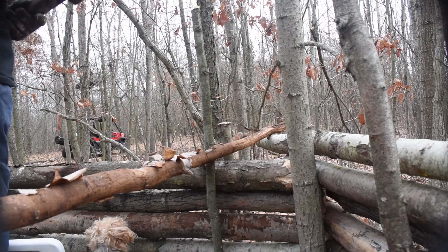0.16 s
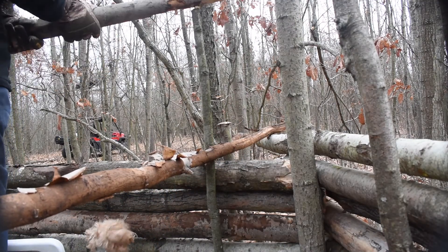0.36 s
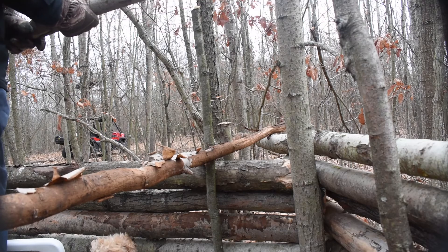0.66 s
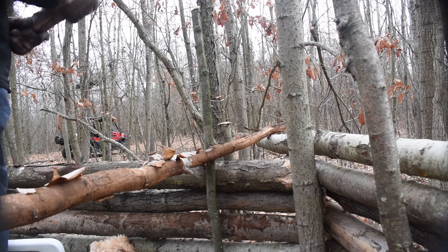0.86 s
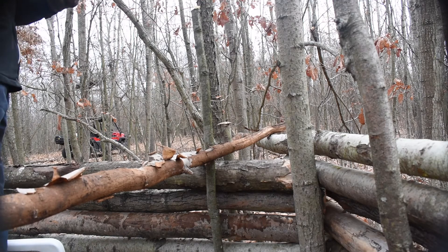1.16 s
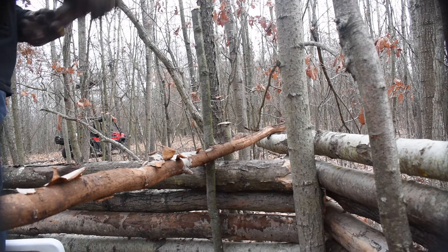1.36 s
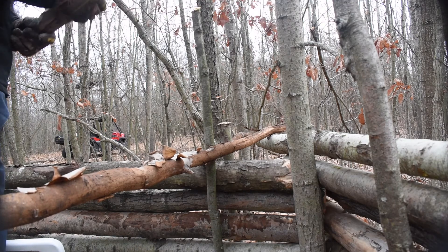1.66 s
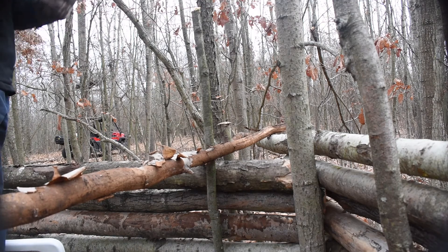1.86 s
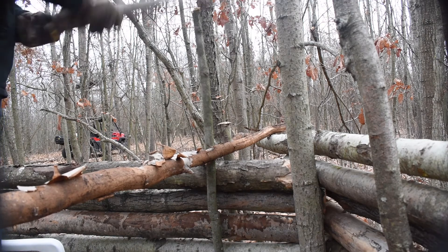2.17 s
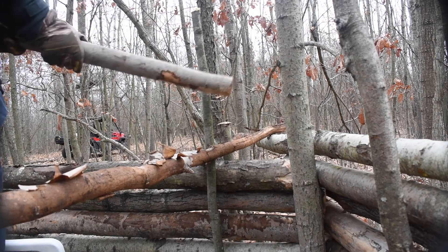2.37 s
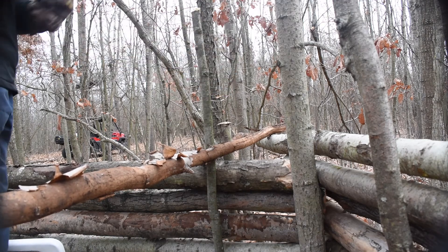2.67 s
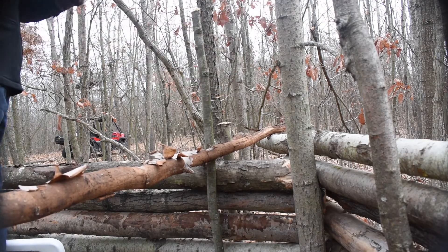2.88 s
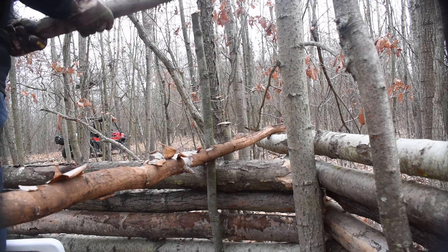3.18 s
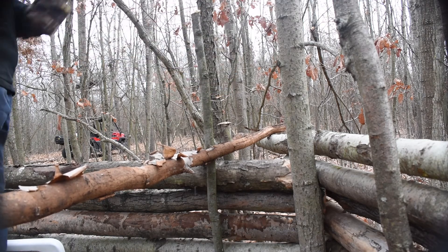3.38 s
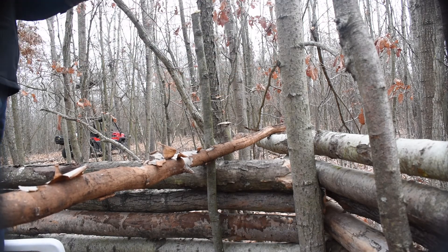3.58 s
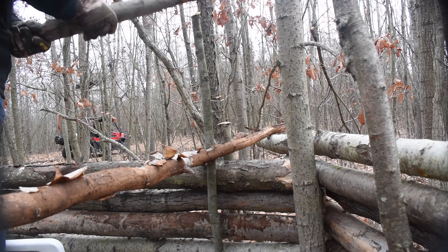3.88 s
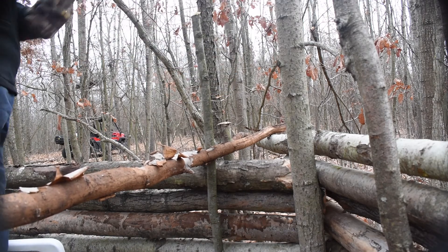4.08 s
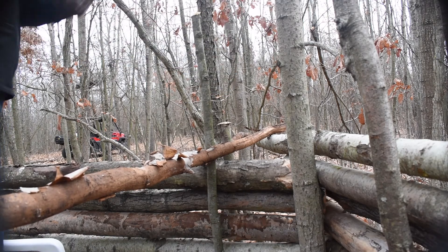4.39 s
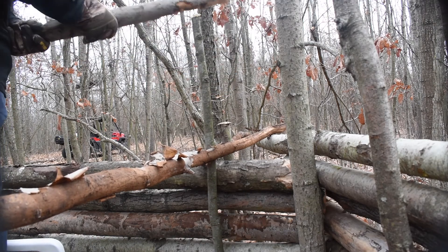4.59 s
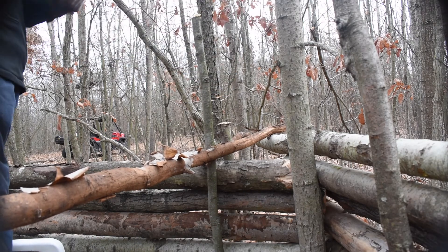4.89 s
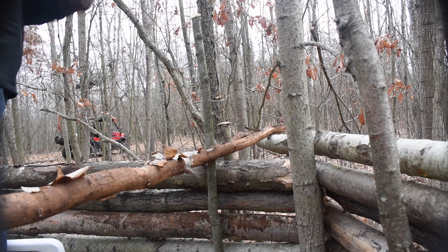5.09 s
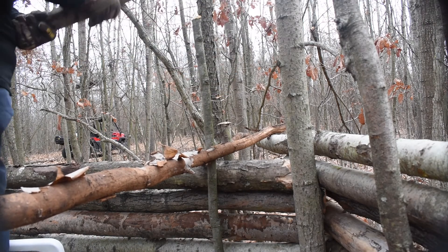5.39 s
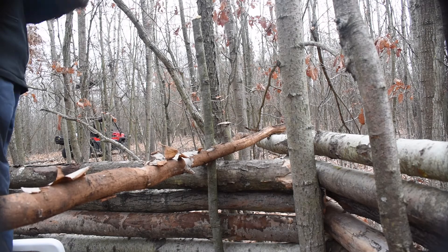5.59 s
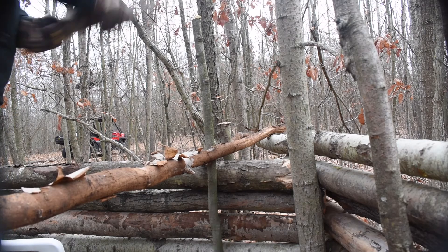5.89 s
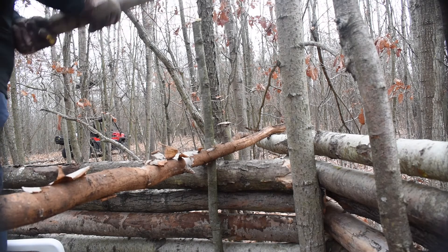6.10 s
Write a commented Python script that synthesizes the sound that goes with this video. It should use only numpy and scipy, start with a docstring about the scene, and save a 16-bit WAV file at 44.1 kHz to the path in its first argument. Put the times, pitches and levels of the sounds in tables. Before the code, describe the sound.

Eight heavy knocks of a pole against stacked logs sound right beside the microphone, the first softer and the later ones harder and slightly distorted. Bark cracks, the logs thud deeply and nearby trees return a short echo. Sticks clack and a tiny metal tag tinkles faintly in the opening seconds, while soft jacket swishes and dry leaf crackles fill the gaps. Behind it lie quiet woodland air and a faint far rumble.

```python
"""A wooden pole is swung eight times against a log wall in bare woods, close to the microphone.
Each blow crushes bark, rings the pole and sets the stacked logs booming; the trees scatter it back,
and the hardest blows overload the microphone. Between them a jacket swishes, dry leaves are scuffed,
sticks clack and a small metal tag tinkles, over still air and a far rumble."""
import sys
import numpy as np
from scipy import signal
from scipy.fft import rfft, irfft
from scipy.io import wavfile
from scipy.ndimage import map_coordinates

SR = 44100
rng = np.random.default_rng(int(sys.argv[2]) if len(sys.argv) > 2 else 0)


def file_out(sig):
    """Save sig as 16-bit WAV at sys.argv[1]."""
    # one column per channel
    cols = np.atleast_2d(sig).T
    # limit, then scale
    lim = np.clip(cols, -1, 1)
    pcm = np.round(lim * 32767).astype(np.int16)
    wavfile.write(sys.argv[1], SR, pcm)


N = 275625
T = np.arange(N) / SR
RING = T[:int(1.5 * SR)]  # time axis of one event, in seconds

# Spectrum of dry leaves underfoot. Each row: frequency in Hz, level in dB.
LEAF_SPECTRUM = [(300, -6.5), (1000, 3.5), (2200, 1.5), (3200, -0.5), (4600, 7), (6000, -6), (7800, 0.5),
                 (11000, -10), (16000, -29)]


def undb(db):
    """Decibels to gain."""
    return 10 ** (np.asarray(db) / 20)


def fade(t60):
    """Exponential decay, 60 dB down after t60 seconds."""
    return np.exp(-np.log(1000) * RING / t60)


def swell(peak_s):
    """A contact force that peaks and lets go."""
    return (RING / peak_s * np.exp(1 - RING / peak_s)) ** 0.98


def stroke(length_s, attack_s, release_s):
    """A movement gathers speed, holds and dies away."""
    return np.minimum(RING / attack_s, 1) * np.exp(-np.maximum(RING - length_s, 0) / release_s)


def add(out, s, sound):
    """Mix a sound in at s seconds."""
    i = max(int(s * SR), 0)
    out[i:i + len(sound)] += sound[:N - i]


def colour(x, points, tilt_db=0):
    """Give white noise or clicks a spectrum of (Hz, dB) points, tilted per octave; rms 1."""
    hz, db = np.transpose(points)
    octave = np.log2(np.maximum(np.fft.rfftfreq(len(x), 1 / SR), 1))
    bass_cut_db = 20 * np.minimum(octave - np.log2(hz[0]), 0)
    gain = undb(np.interp(octave, np.log2(hz), db) + tilt_db * octave + bass_cut_db)
    y = irfft(rfft(x) * gain, len(x))
    return y / np.std(y)


def hiss(points, tilt_db=0):
    """Coloured noise as long as one event."""
    return colour(rng.standard_normal(len(RING)), points, tilt_db)


def grains(per_s, spread_db):
    """Tiny clicks of uneven size at random times."""
    clicks = (rng.random(N) < per_s / SR) * rng.standard_normal(N)
    return clicks * undb(spread_db * np.minimum(rng.exponential(size=N), 4))


def walk(per_s):
    """Random wander, spread near 1."""
    knots = rng.standard_normal(1024)
    return np.interp(T * per_s, np.arange(len(knots)), knots)


def patchy(x, depth_db, per_s, width_hz):
    """Let patches of the spectrum swell and fade at random; rms 1."""
    hz, s, spectra = signal.stft(x, SR, nperseg=512)
    knots = rng.standard_normal((512, 512))
    grid = np.meshgrid(hz / width_hz, s * per_s, indexing="ij")
    db = depth_db * map_coordinates(knots, grid, order=1)
    y = signal.istft(spectra * undb(db), SR)[1][:len(x)]
    return y / np.std(y)


def ring(modes, rise_s, weights_db=0):
    """Decaying modes that build up while the contact lasts."""
    hz, db, t60 = np.transpose(modes)[:, :, None]
    waves = undb(db + np.reshape(weights_db, (-1, 1))) * fade(t60) * np.cos(2 * np.pi * hz * RING)
    return waves.sum(0) * (1 - np.exp(-RING / rise_s))


def woods():
    """The bed of the place: still air among bare trees over a far rumble."""
    # Spectra of the air and the rumble. Each row: frequency in Hz, level in dB.
    air_spectrum = [(120, -16), (300, -10), (650, -10.5), (1200, -13.5), (1700, -18.5), (4000, -21.5),
                    (7000, -28), (16000, -32)]
    rumble_spectrum = [(20, -6.5), (35, -2.5), (55, 0.5), (90, -14), (130, -3), (170, -19.5), (300, -37.5),
                       (1000, -71.5)]
    air_level = undb(-58.5 + 0.39 * walk(3))
    air = patchy(colour(rng.standard_normal(N), air_spectrum), depth_db=1, per_s=25, width_hz=200)
    rumble = undb(-51.5 + 1.5 * walk(1.3)) * colour(rng.standard_normal(N), rumble_spectrum)
    return air_level * air + rumble


def jacket(attack_s=0.021, release_s=0.051):
    """Cloth slides over cloth: a fine grain that catches unevenly and swells with each arm stroke."""
    # Spectrum of rubbing cloth. Each row: frequency in Hz, level in dB.
    cloth_spectrum = [(250, -7.5), (600, 3.5), (1500, 4.5), (3200, 4), (4700, 0), (6000, -11.5),
                      (7800, -12), (11000, -18.5), (16000, -30)]
    # Sleeve strokes. Each row: start in seconds, length in seconds, level in dB, treble trim in dB.
    swishes = [(0.0, 0.078, -47, -6), (1.558, 0.076, -52.5, -5), (1.759, 0.19, -54, -0.5),
               (1.843, 0.28, -54.5, 0), (2.39, 0.023, -47.5, -1), (2.44, 0.062, -59.5, 0),
               (2.649, 0.21, -51, -4), (2.86, .15, -50, -2), (3.255, .07, -45.5, -4),
               (3.307, 0.056, -42, -3), (3.449, 0.13, -47.5, -3), (3.593, .17, -43, 0),
               (3.663, 0.034, -37, -5), (3.917, 0.08, -47, -4.5), (4.03, 0.11, -47, -4),
               (5.3, 0.021, -50, -3), (5.711, 0.043, -45.5, -4)]
    rub = colour(grains(per_s=5000, spread_db=2.5), cloth_spectrum) * undb(1.5 * walk(70))
    rub = patchy(rub, depth_db=3.5, per_s=25, width_hz=300)
    treble = signal.sosfiltfilt(signal.butter(4, 5500, "high", fs=SR, output="sos"), rub)
    body_power, treble_power = np.zeros(N), np.zeros(N)
    for s, length, db, treble_db in swishes:
        level = undb(db) * stroke(length, attack_s, release_s)
        add(body_power, s, level ** 2)
        add(treble_power, s, (undb(treble_db - 6) * level) ** 2)
    return np.sqrt(body_power) * (rub - treble) + np.sqrt(treble_power) * treble / np.std(treble)


def litter():
    """Dry leaves tick faintly here and there underfoot."""
    tick = rng.standard_normal(len(RING)) * fade(0.008)
    ticks = signal.fftconvolve(grains(per_s=45, spread_db=1.5), tick)[:N]
    ticks = colour(ticks, LEAF_SPECTRUM, tilt_db=1.5)
    return undb(-69) * patchy(ticks, depth_db=3, per_s=30, width_hz=3000)


def leaves(bite_db=2, bite_s=0.008):
    """Each scuff through dry leaves bites at once, crackles while it lasts and dies away."""
    # Scuffs on the ground. Each row: start in seconds, length in seconds, level in dB.
    scuffs = [(0.135, .025, -52), (1.106, .012, -44.5), (1.151, 0.018, -47), (1.377, 0.031, -47),
              (1.467, 0.036, -41.5), (1.715, 0.0087, -47.5), (2.155, 0.007, -42), (4.919, 0.0022, -39.5),
              (4.945, 0.063, -47), (5.029, 0.035, -45.5), (5.588, 0.055, -38), (5.663, 0.032, -39),
              (5.811, 0.025, -46.5)]
    level = np.zeros(N)
    bite = undb(bite_db * np.exp(-RING / bite_s))  # the first leaves to break are the loudest
    for s, length, db in scuffs:
        add(level, s, undb(db) * bite * stroke(length, attack_s=0.001, release_s=0.019))
    crackle = grains(per_s=3500, spread_db=3) * undb(2.5 * walk(130))
    return level * patchy(colour(crackle, LEAF_SPECTRUM), depth_db=2.5, per_s=29, width_hz=300)


def sticks(contact_cycles=117, rise_s=0.00016):
    """Light hollow clacks: a rough contact and the brief ring of the stick."""
    # Sticks and twigs that clack or snap. Each row: start in seconds, level in dB, centre in Hz.
    clacks = [(0.2317, -38.5, 7160), (0.4458, -29.5, 2230), (0.5304, -25, 2130), (0.547, -33, 2000),
              (0.847, -51, 2600), (1.1, -40.5, 3260), (1.176, -33.5, 6600), (1.209, -31, 1840),
              (1.218, -24, 1950), (1.233, -21.5, 2060), (1.246, -29, 2050), (1.2672, -29.5, 2220),
              (1.622, -35, 7750), (2.843, -38.5, 4500), (2.869, -28.5, 4390), (4.921, -34.5, 3820),
              (5.07, -43, 4000), (5.818, -35, 4740), (5.992, -34.5, 5030)]
    # Modes of a light stick. Each row: multiple of the centre, level in dB, free t60 in seconds.
    stick_modes = [(.55, -6, 0.081), (.69, 2, 0.044), (.82, 3, 0.033), (.95, 2.5, 0.041), (1.14, -2, 0.023),
                   (2.05, -5, .025)]
    out = np.zeros(N)
    for s, db, hz in clacks:
        t60 = contact_cycles / hz  # thin, high twigs are the briefest
        spectrum = [(hz / 6, -13), (hz / 3, -11), (hz * 0.62, -9), (hz, 0),
                    (hz * 1.52, -10), (hz * 2.76, -24), (hz * 6, -37)]
        contact = hiss(spectrum) * fade(t60)
        weights_db = 2 * rng.standard_normal(len(stick_modes))
        hollow = ring(np.array(stick_modes) * [hz, 1, 1], rise_s, weights_db) * fade(2 * t60)
        add(out, s, undb(db) * (undb(-5) * contact + undb(-9) * hollow))
    return out


def pole(place, pitch, ring_share, place_db=2.5, rise_s=0.0017):
    """The place struck favours some of the pole's modes; grip and pressure retune and damp them."""
    # Modes of the pole and the log it meets. Each row: frequency in Hz, level in dB, free t60 in seconds.
    pole_modes = [(218.3, -24, 0.15), (245.4, -4.5, 0.034), (304, -19.5, .088), (380, -12, 0.12),
                  (443, -9.5, 0.094), (475.7, -21, 0.13), (493, -13, 0.14), (566, -18.5, 0.11),
                  (631, -10.5, 0.086), (733, -18.5, 0.086), (784, -10, 0.058), (926.6, -6, 0.048),
                  (1015, -11.5, 0.07), (1101, 2.5, 0.025), (1507, -14, .04), (2055, -10, 0.023),
                  (2580, -29.5, .03), (3140, -24, .028), (3580, -23.5, 0.038), (3976, -15, .021)]
    order = np.arange(len(pole_modes)) + 1
    weights_db = place_db * np.cos(2 * np.pi * order * place)
    modes = np.array(pole_modes) * [pitch, 1, ring_share]
    # neighbouring bending modes swing in opposite directions at the free end
    return ring(modes[::2], rise_s, weights_db[::2]) - ring(modes[1::2], rise_s, weights_db[1::2])


def blows(snap_lag_s=0.004):
    """Close by, each blow knocks, crushes bark until it snaps, rings the top log and shakes the wall."""
    # Eight blows and two rebounds. Each row: start in seconds, knock, boom, crack and snap gains in dB,
    # place struck along the pole from 0 to 1, pitch ratio, share of the free ring time.
    strikes = [(0.3085, -10, -7, -5.5, -14, 0.47, 0.96, 0.84), (1.4066, 0, -2, 3, -5, 0.13, 1.02, 1),
               (2.2025, 1.5, -4, -0.5, -0.5, 0.05, 1.07, 0.88),
               (2.215, -6.5, -16.5, -39, -35.5, 0.5, 0.99, 0.67),
               (2.2236, 1.5, -22.5, -4.5, -47, 0.28, 1.05, 0.56),
               (3.057, -0.5, -1.5, -4.5, 3, .491, 1, 1.11), (3.7775, 4.5, 0.5, 6.5, 2.5, 0.46, 1, 0.66),
               (4.5022, 4.5, 0, 4.5, -5, 0.1, 0.98, 0.73), (5.2157, 2, 1, -5, 7.5, 0.52, 0.97, 1),
               (5.9293, 6.5, 1, 7, 2.5, 0.2, 0.96, 0.68)]
    # Bending modes of the stacked logs, then the short ring of the top log where the pole lands.
    # Each row: frequency in Hz, level in dB, t60 in seconds.
    wall_modes = [(36, -35.5, 1.2), (50, -33.5, 0.13), (58.33, -12.5, 0.68), (69.3, -21.5, 1.236),
                  (85.73, -21, 0.62), (91.8, -6.5, 0.4), (140.6, -10, 0.13)]
    top_log_modes = [(171, -21.5, 0.068), (287, -21.5, 0.082), (1307, -21.5, 0.03), (1543, -15, .045),
                     (2215, -15, .025), (3496, -22, .03)]
    # Spectrum of crushed bark. Each row: frequency in Hz, level in dB.
    bark_spectrum = [(150, 3), (400, 0.5), (1000, 1), (1700, -8), (2600, -6), (3600, -3), (5500, -18),
                     (8000, -15), (11000, -22.5), (16000, -37)]
    out = np.zeros(N)
    boom = ring(wall_modes, rise_s=0.0035)
    top_log = ring(top_log_modes, rise_s=0.0025)
    for s, knock_db, boom_db, crack_db, snap_db, place, pitch, ring_share in strikes:
        knock = pole(place, pitch, ring_share) + top_log + ring_share * trees()
        crack = hiss(bark_spectrum) * swell(peak_s=0.0021)
        snap = hiss(bark_spectrum, tilt_db=-2) * swell(peak_s=0.001)
        add(out, s, undb(knock_db) * knock + undb(boom_db) * boom + undb(crack_db - 15) * crack)
        add(out, s + snap_lag_s, undb(snap_db - 7.5) * snap)
    return out


def trees():
    """Near trunks return a quick scatter of uneven echoes, far ones a faint, longer tail."""
    # Spectrum of the scatter from the trunks. Each row: frequency in Hz, level in dB.
    scatter_spectrum = [(120, 4), (500, 2), (1000, -2.5), (2000, -18.5), (4000, -20.5), (8000, -28),
                        (16000, -44)]
    echoes = colour(grains(per_s=7000, spread_db=-3.5)[:len(RING)], scatter_spectrum)
    tail = patchy(hiss(scatter_spectrum, tilt_db=1.5), depth_db=6.5, per_s=11, width_hz=92)
    near = undb(-18.5) * echoes * fade(0.17)
    far = undb(-39) * tail * fade(0.64)
    return (near + far) * (1 - np.exp(-RING / 0.0017))


def tag(rise_s=0.00052):
    """A small metal tag swings and rings very high; each touch favours its lower or its upper modes."""
    # Touches of the tag. Each row: start in seconds, level in dB, brightness in dB per octave.
    tinkles = [(.409, -76, 15), (.543, -64, -20), (1.25, -47, 30), (1.357, -48, 5), (1.555, -44.5, 20)]
    # Modes of the tag. Each row: frequency in Hz, level in dB, t60 in seconds.
    tag_modes = [(7540, 0, 0.11), (10700, -12.5, .15), (10900, -6.5, .15), (13380, -26, 0.18)]
    out = np.zeros(N)
    octaves = np.log2(np.array(tag_modes)[:, 0])
    for s, db, tilt_db in tinkles:
        add(out, s, undb(db) * ring(tag_modes, rise_s, tilt_db * (octaves - octaves.mean())))
    return out


def scene():
    """Everything as it reaches one microphone beside the log wall."""
    return (blows() + sticks() + leaves() + litter() + jacket() + tag() + woods())[None]


def record(dry, low_cut_hz=22, top_hz=15900):
    """The microphone sheds the deepest bass and clips on the hardest blows; the top is cut."""
    lean = signal.sosfilt(signal.butter(1, low_cut_hz, "high", fs=SR, output="sos"), dry)
    clipped = np.clip(lean, -1, 1)
    return signal.sosfilt(signal.ellip(8, 0.2, 70, top_hz, fs=SR, output="sos"), clipped)


dry = scene()
out = record(dry)
file_out(out)
```